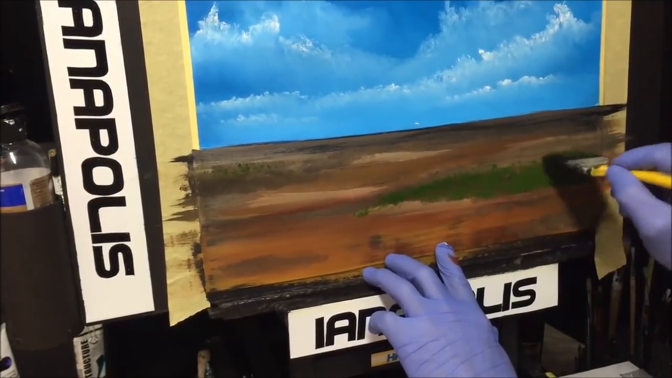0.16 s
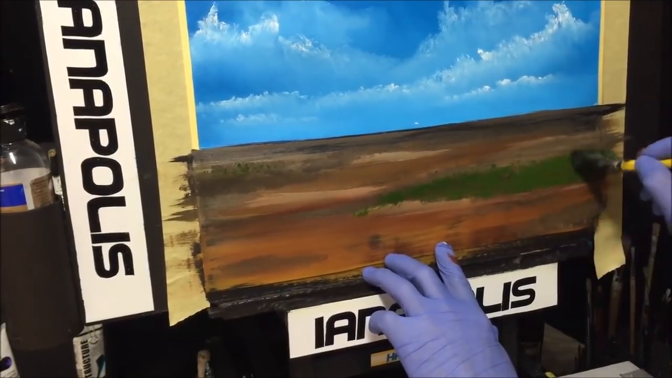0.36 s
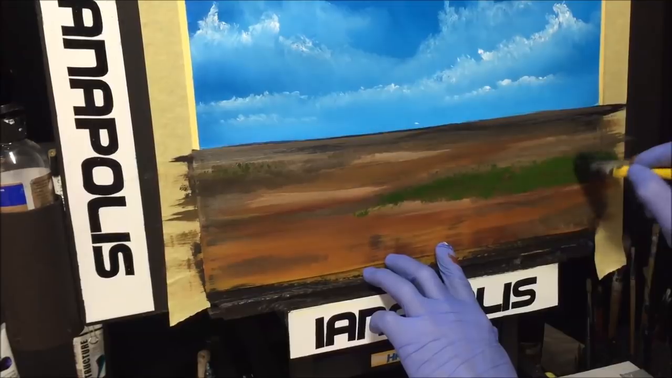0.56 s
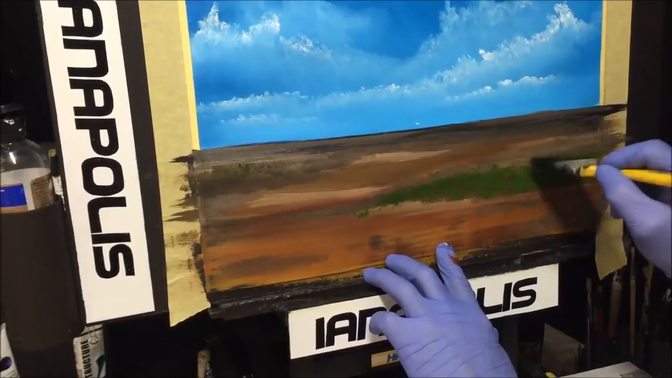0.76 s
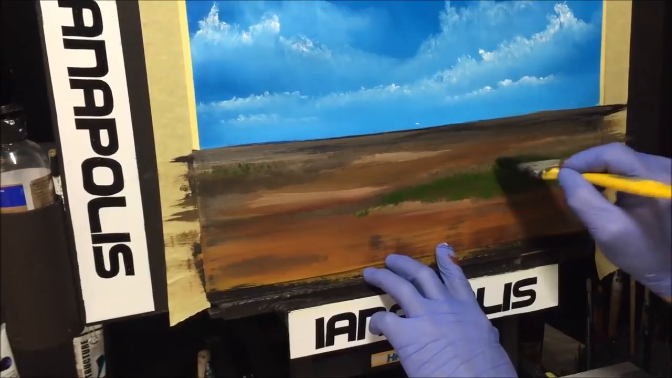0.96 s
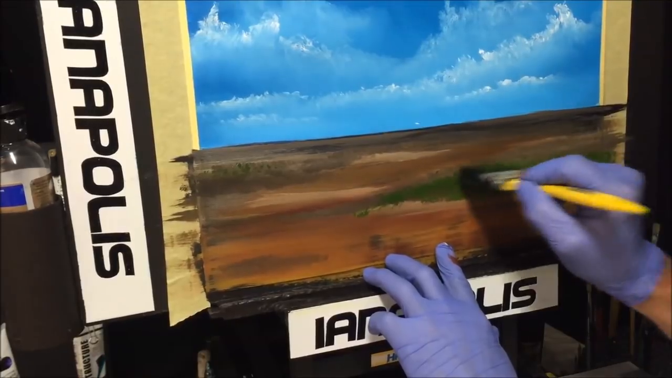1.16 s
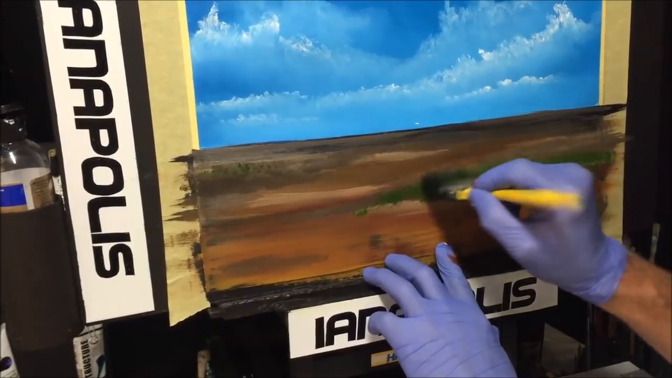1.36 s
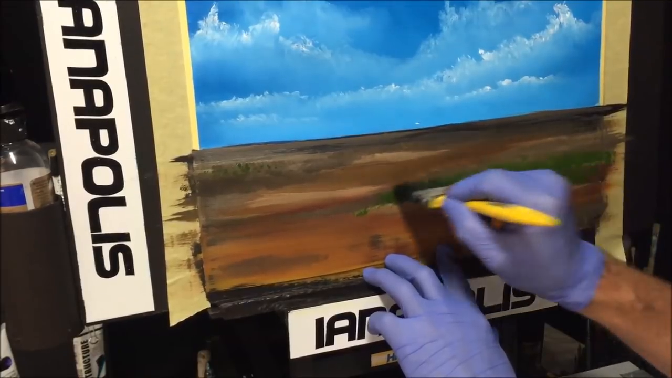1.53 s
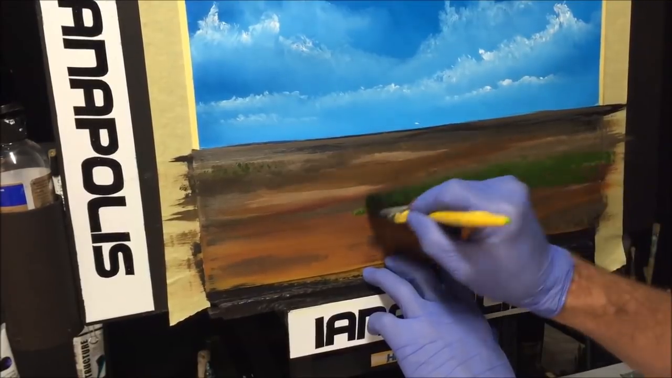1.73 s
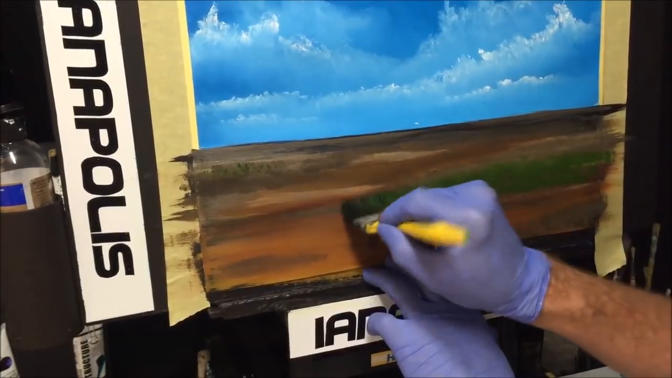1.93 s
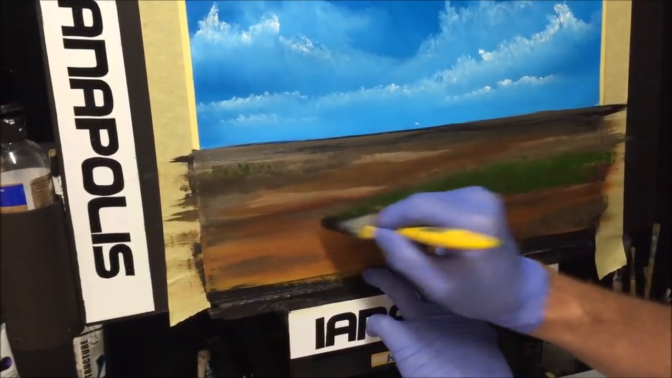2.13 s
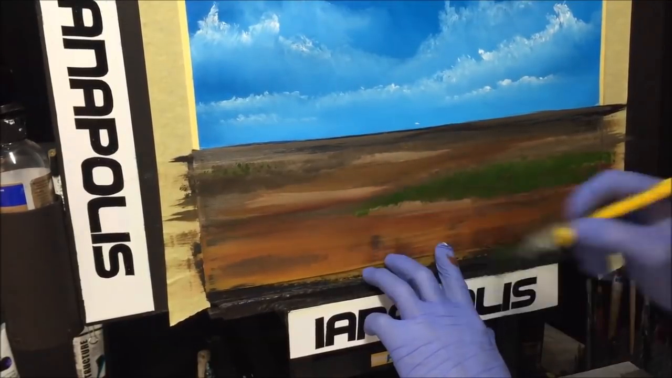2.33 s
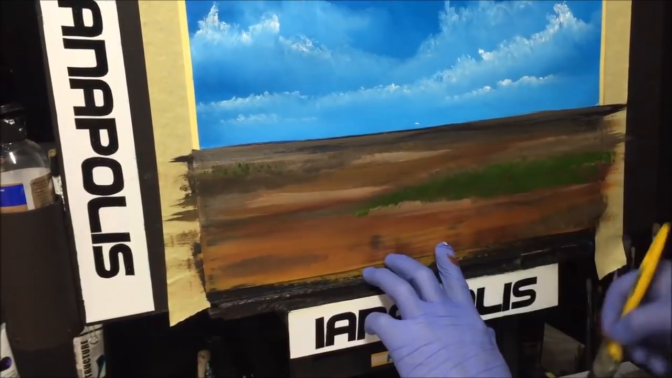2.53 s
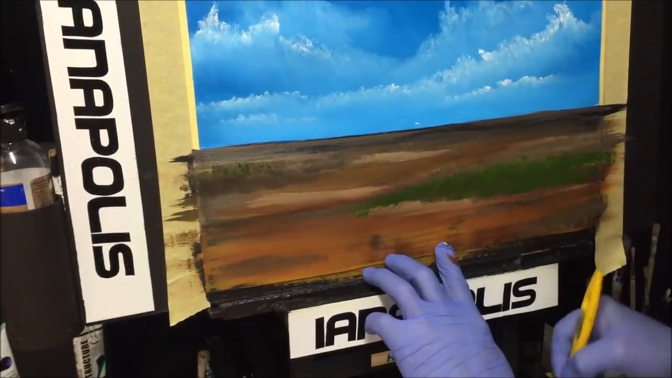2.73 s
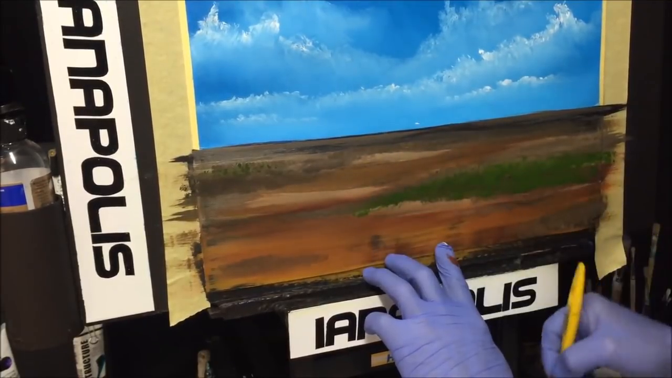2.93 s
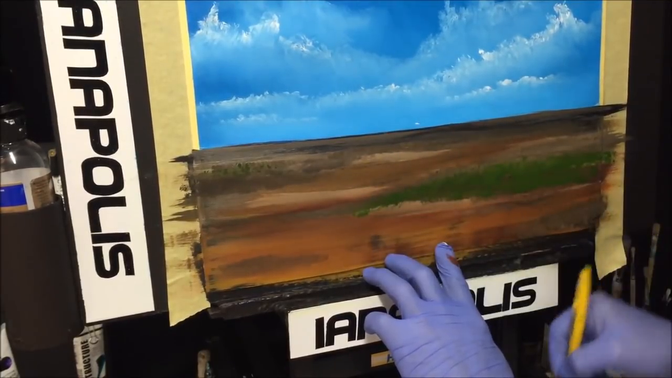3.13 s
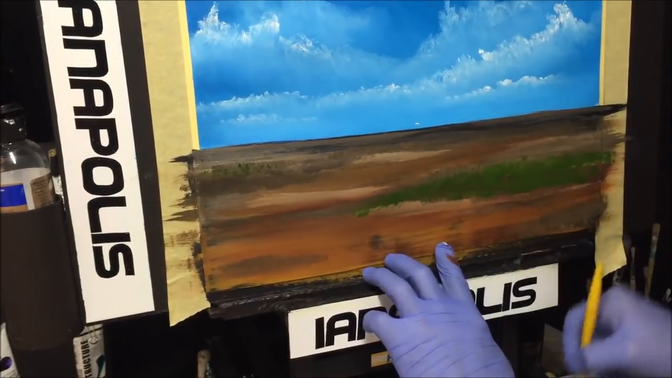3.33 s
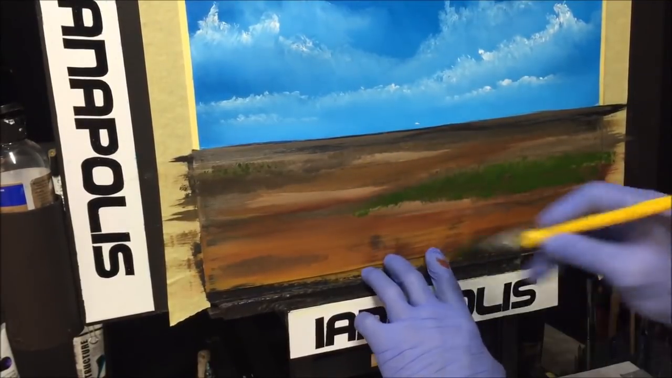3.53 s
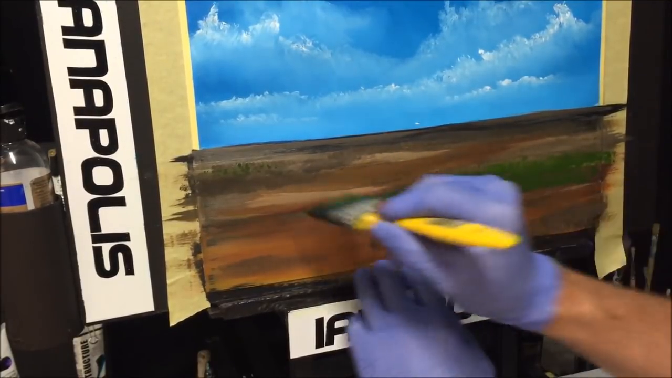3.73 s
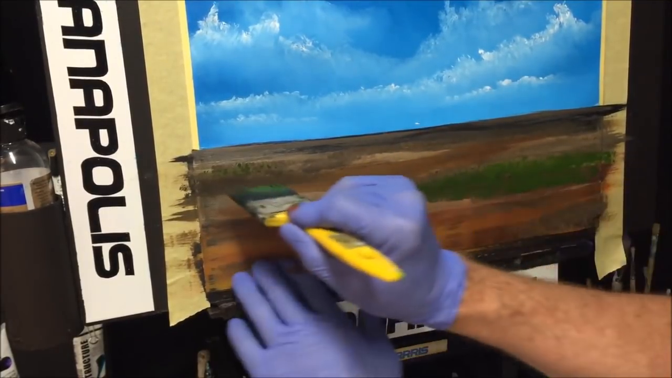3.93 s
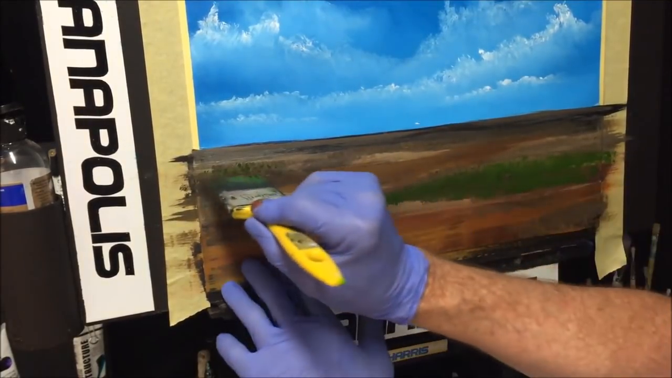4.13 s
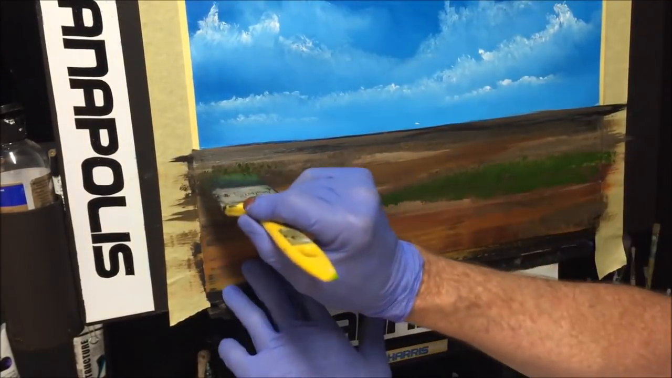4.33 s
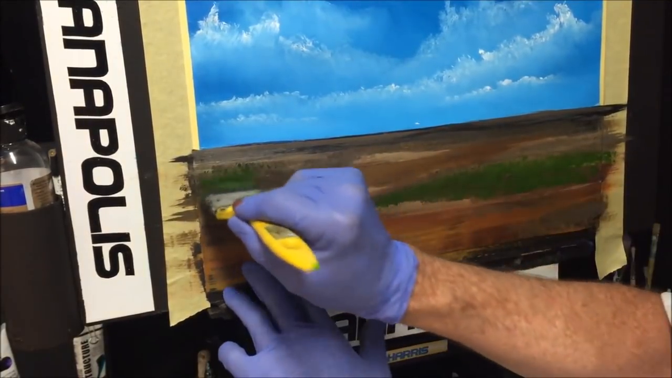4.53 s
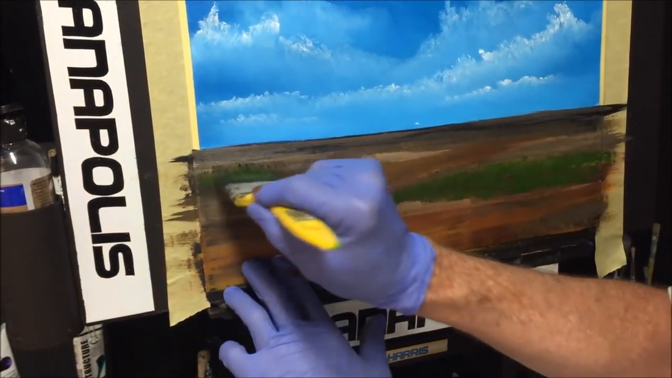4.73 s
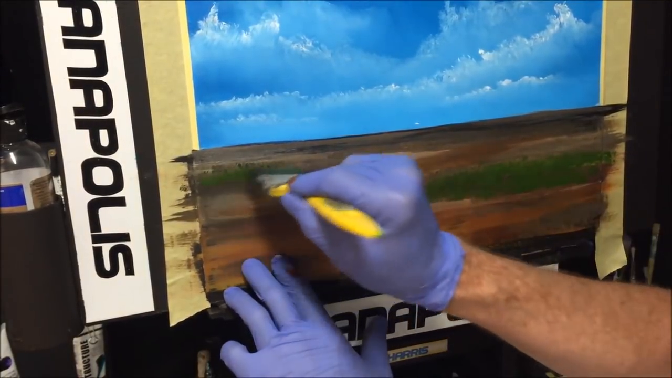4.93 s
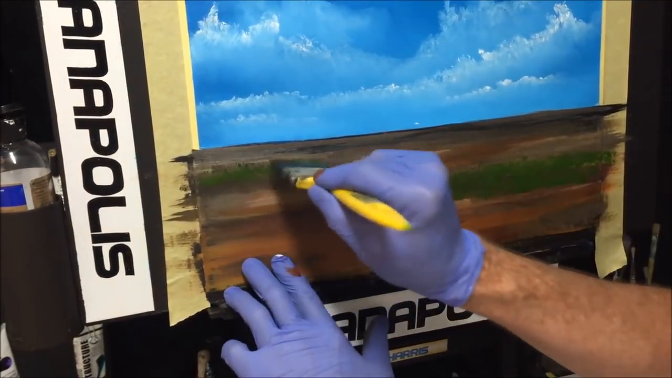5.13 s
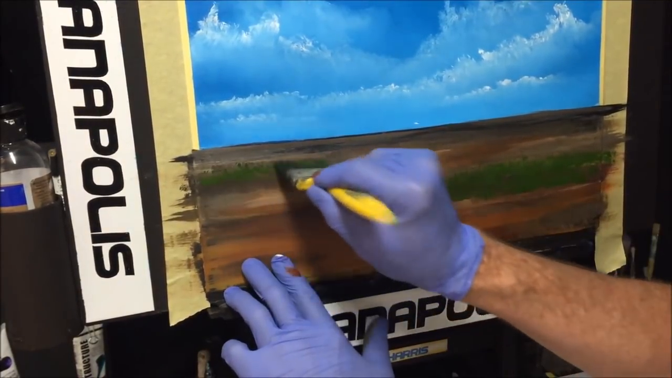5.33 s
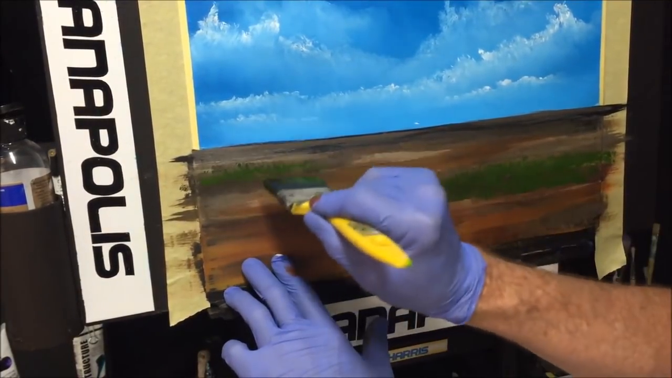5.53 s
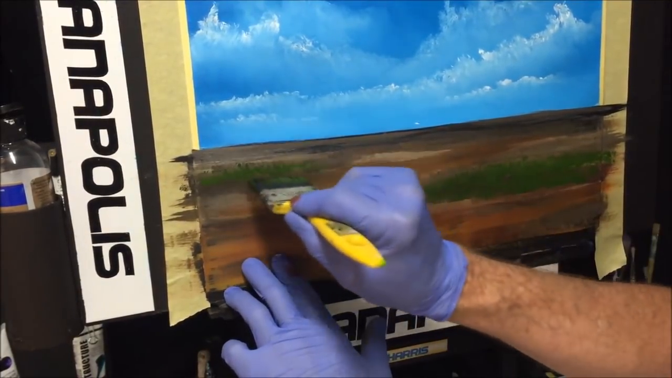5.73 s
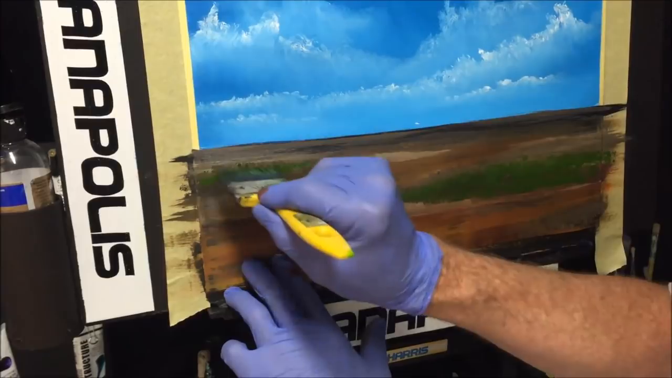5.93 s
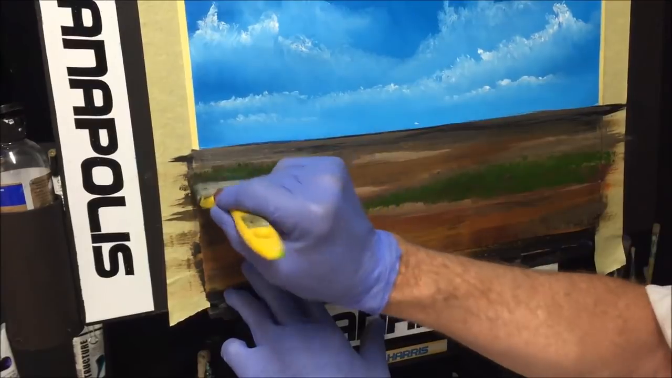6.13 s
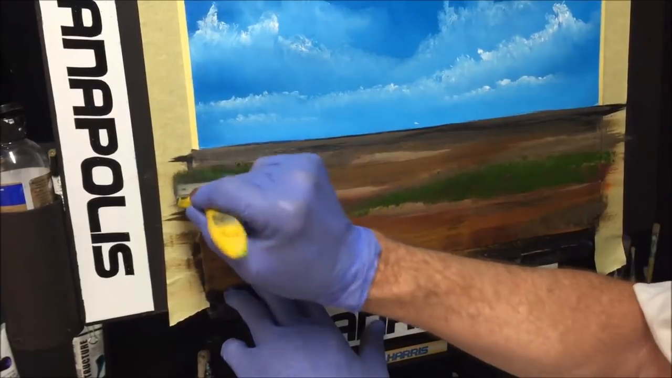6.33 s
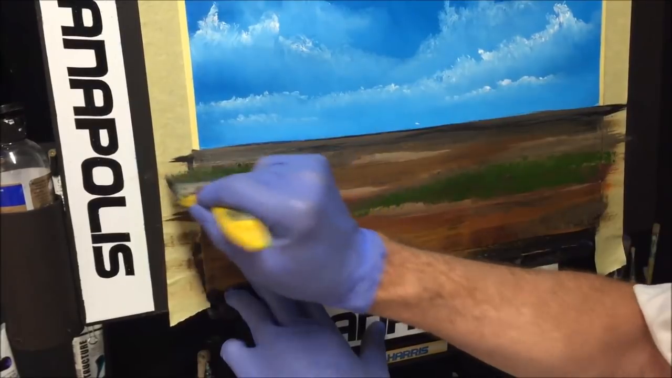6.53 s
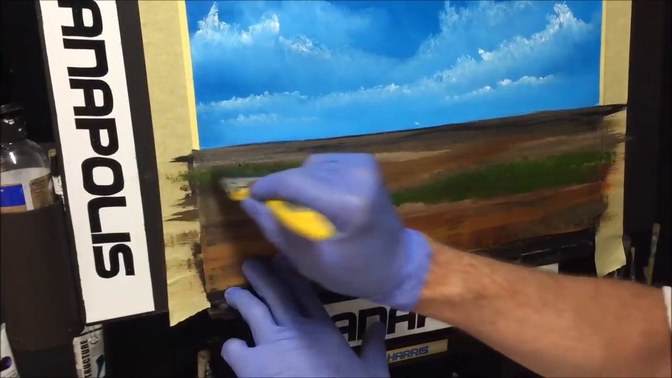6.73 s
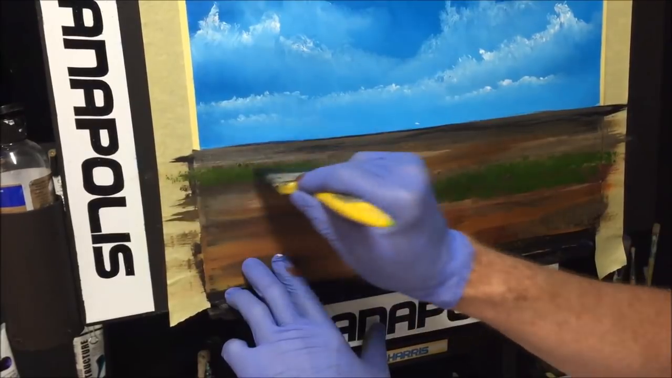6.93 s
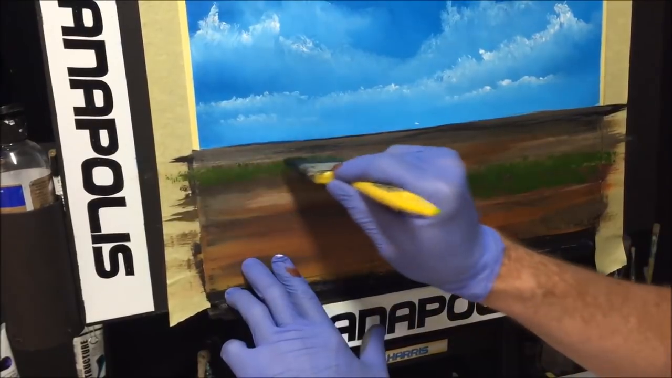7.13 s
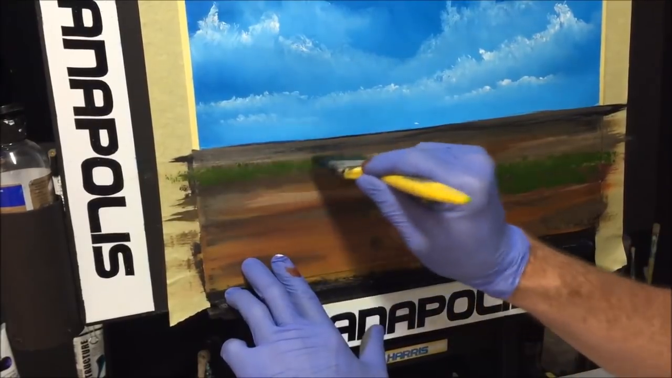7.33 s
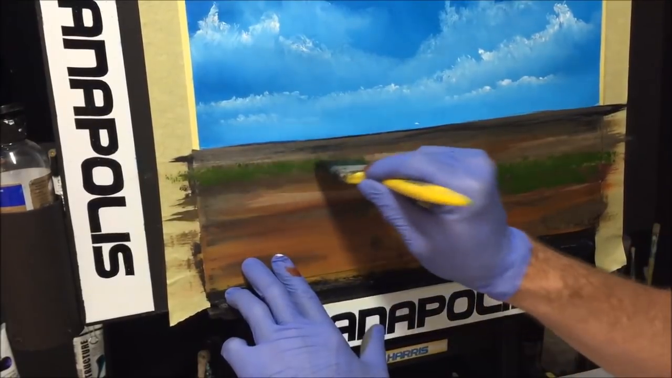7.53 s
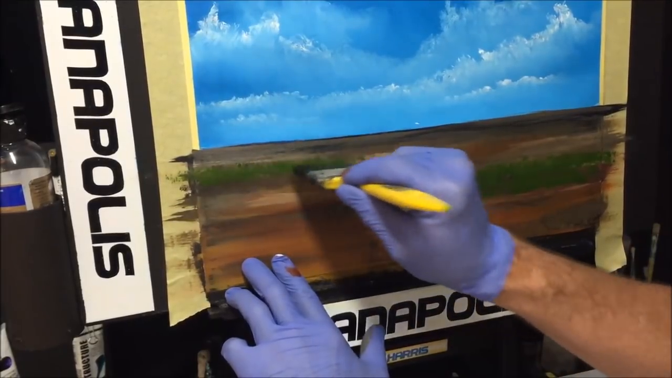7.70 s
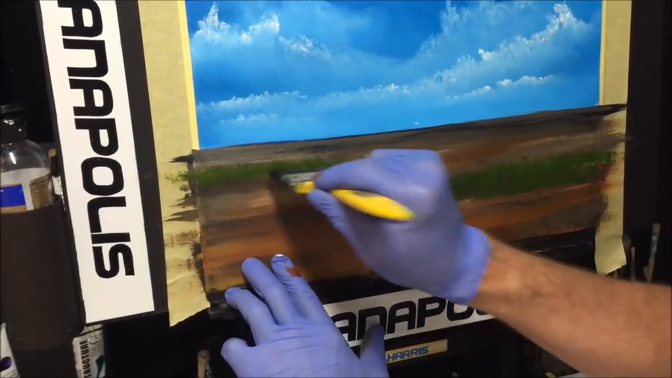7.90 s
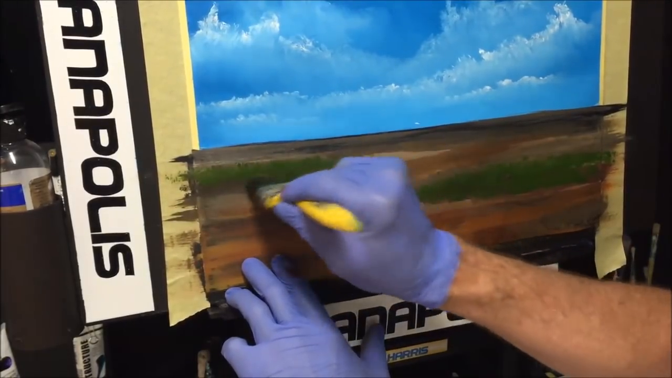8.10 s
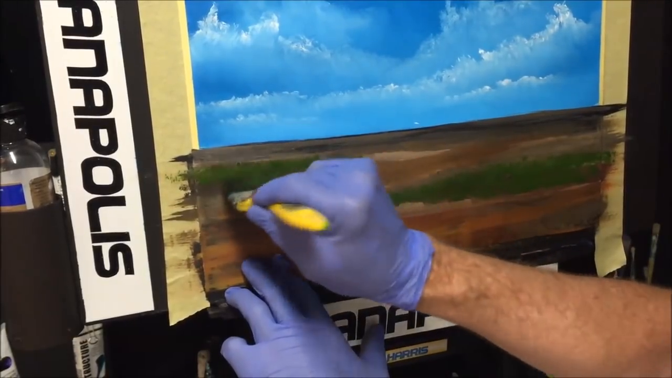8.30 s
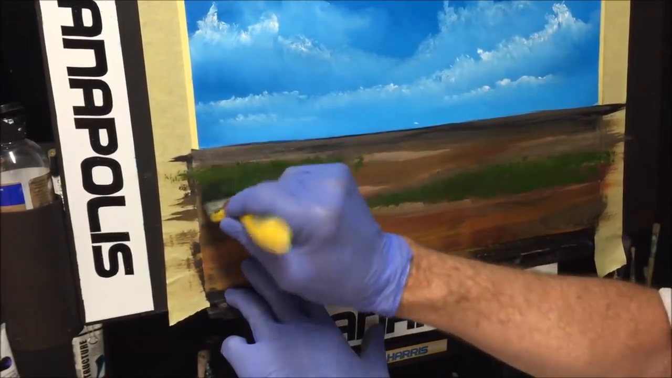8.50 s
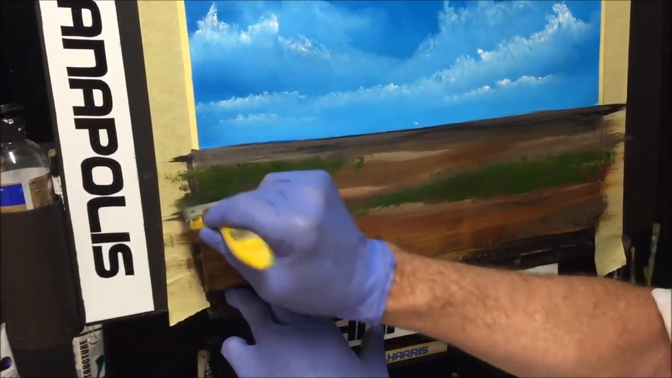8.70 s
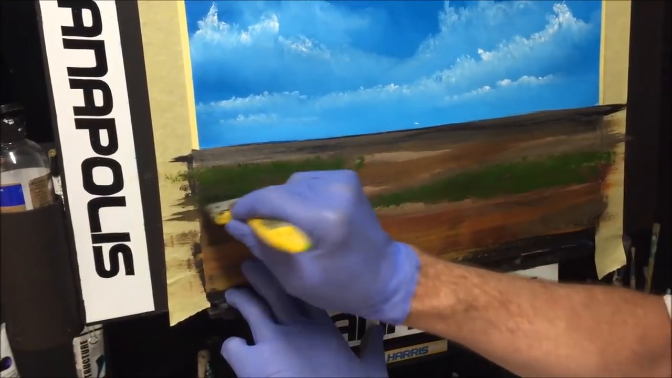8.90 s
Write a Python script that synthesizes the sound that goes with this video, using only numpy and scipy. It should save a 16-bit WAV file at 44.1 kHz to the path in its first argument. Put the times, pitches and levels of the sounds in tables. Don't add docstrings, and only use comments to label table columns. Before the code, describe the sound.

Quick, steady brush taps thud on a hollow board in a quiet room, broken by four wetter dabs, then resume harder and brighter over faint hum.

```python
import sys
import numpy as np
from scipy import signal
from scipy.fft import rfft, irfft, next_fast_len
from scipy.io import wavfile
from scipy.ndimage import uniform_filter1d

SR = 44100
rng = np.random.default_rng(int(sys.argv[2]) if len(sys.argv) > 2 else 0)


def undo_db(level):
    steps = np.asarray(level, float) / 20
    return 10 ** steps


def store_pcm(level_fs):
    pcm = np.round(np.clip(level_fs, -1, 1) * 32767).astype(np.int16)
    wavfile.write(sys.argv[1], SR, np.atleast_2d(pcm).T)


N = 399546


def rms_one(x):
    return x / np.sqrt(np.mean(x ** 2) + 1e-20)


def low_pass(x, hz):
    return signal.sosfilt(signal.butter(2, hz, fs=SR, output="sos"), x)


def high_pass(x, hz, order=2):
    return signal.sosfilt(signal.butter(order, hz, "high", fs=SR, output="sos"), x)


def band_pass(x, low_hz, high_hz):
    return signal.sosfilt(signal.butter(2, [low_hz, high_hz], "band", fs=SR, output="sos"), x)


def in_time(rows):
    s, values = np.transpose(rows)
    return np.interp(np.arange(N) / SR, s, values)


def spikes(times, sizes):
    out = np.full(N, 1e-18)
    places = np.clip((np.asarray(times) * SR).astype(int), 0, N - 1)
    np.add.at(out, places, sizes)
    return out


def fade(x, t60):
    return signal.lfilter([1], [1, -undo_db(-60 / (t60 * SR))], x)


def ring(clicks, hz, t60):
    r = undo_db(-60 / (t60 * SR))
    w = 2 * np.pi * hz / SR
    return signal.lfilter([0, np.sin(w)], [1, -2 * r * np.cos(w), r * r], clicks)


def coloured(x, points):
    hz, level_db = np.transpose(points)
    size = next_fast_len(N)
    grid = np.maximum(np.arange(size // 2 + 1) * SR / size, 1)
    gain = undo_db(np.interp(np.log(grid), np.log(hz), level_db))
    return rms_one(irfft(rfft(x, size) * gain, size)[:N])


def grains(per_s, spread_db):
    sizes = undo_db(spread_db * np.minimum(rng.exponential(1, N), 5))
    signs = rng.choice([-1, 1], N)
    return sizes * signs * (rng.random(N) < per_s / SR)


def narrow(hz, width_hz):
    r = np.exp(-2 * np.pi * width_hz / SR)
    wander = rms_one(signal.lfilter([1], [1, -2 * r, r * r], rng.standard_normal(N)))
    return np.sqrt(2) * np.sin(2 * np.pi * np.cumsum(hz + width_hz * wander) / SR)


def lumps(depth_db, per_s):
    knots = np.arange(0, N / SR + 1, 1 / per_s)
    return undo_db(depth_db * np.interp(np.arange(N) / SR, knots, rng.standard_normal(len(knots))))


def stabs():
    # start_s, thump_db, hardness_db, handle_knock_db, crack_db
    right_stabs = [(0.1326, -19, -6, -31, -30), (0.3043, -15, -5, -27.5, -27),
                   (0.4689, -19, -17, -31, -27.5), (0.628, -23.5, -37.5, -25.5, -28),
                   (0.797, -19.5, -8, -24.5, -30), (0.9719, -24.5, -5.5, -30.5, -31),
                   (1.1345, -20.5, -11.5, -32, -28.5), (1.31, -19, -8, -27, -33.5),
                   (1.4864, -20, -10, -41.5, -36), (1.6663, -21.5, -7, -28, -34),
                   (1.8429, -27.5, -17, -29, -30.5), (2.015, -23.5, -10.5, -31, -29.5),
                   (2.1792, -25.5, -9.5, -24, -23)]
    dabs = [
        (2.813, -27, -15, -66, -26),
        (3.022, -21, -4.5, -28.5, -32.5),
        (3.2138, -19, -3, -20, -38.5),
        (3.3946, -11.5, -5, -43.5, -17),
        (3.4, -61, -4.5, -73, -12.5),
    ]
    left_stabs = [(4.5563, -22.5, -1.5, -24, -19), (4.7633, -25.5, -3.5, -38.5, -27),
                  (4.9406, -17.5, -5, -26, -28), (5.1266, -15, -2.5, -22.5, -24.5),
                  (5.2995, -15.5, -3, -14, -19), (5.4683, -16.5, -2.5, -17, -25.5),
                  (6.1977, -21, -2.5, -20.5, -18.5), (6.402, -20, -3, -31.5, -23),
                  (6.5819, -20, -5.5, -29, -24.5), (6.784, -17, -2.5, -25.5, -22),
                  (6.967, -15, -2.5, -31, -22.5), (7.1517, -18, -3, -27.5, -24),
                  (7.3346, -22.5, -2.5, -31, -27.5), (7.5104, -19, -6.5, -31.5, -25.5),
                  (7.6885, -21, -5.5, -27.5, -22.5), (7.8674, -24, -3, -36.5, -25),
                  (8.0585, -15.5, -3.5, -27, -20), (8.234, -18, -3.5, -23, -22.5),
                  (8.4114, -21, -4, -24.5, -23.5), (8.586, -22, -2.5, -22.5, -21.5),
                  (8.76, -24.5, -2, -25.5, -27.5), (8.9599, -21.5, -3, -25.5, -24.5)]
    return np.transpose(right_stabs + dabs + left_stabs)


def grip(s):
    # start_s, board_looseness_db, board_pitch_hz, handle_pitch_hz
    grips = [(0.133, -17.5, 316.8, 2230), (0.303, -17.5, 281.8, 2450), (0.468, -21.5, 273, 2360),
             (0.628, -34, 276.5, 2650), (0.796, -24.5, 295, 2550), (0.969, -23, 326, 2620),
             (1.134, -22.5, 315.9, 1910), (1.309, -21, 326, 2070), (1.486, -24, 326, 1890),
             (1.666, -21.5, 326, 1650), (1.843, -22.5, 318.2, 1566), (2.014, -22, 331.6, 1800),
             (2.177, -24, 334, 1866), (2.811, -26, 261, 3500), (3.02, -16, 261, 1300),
             (3.213, -12.5, 268, 1292), (3.394, -15.5, 260, 3220), (4.554, -18.5, 377.7, 1460),
             (4.762, -25.5, 377, 3160), (4.939, -14.5, 386.4, 2890), (5.124, -18.5, 361, 1500),
             (5.298, -21, 365, 1380), (5.466, -17, 362.6, 1305), (6.196, -17, 373.8, 1340),
             (6.4, -15.5, 372, 1370), (6.581, -14, 370, 3280), (6.783, -17.5, 372.2, 1870),
             (6.966, -10, 367, 1520), (7.15, -18, 375.8, 2740), (7.333, -18.5, 358, 1690),
             (7.51, -16.5, 342, 2135), (7.688, -17.5, 347, 1757), (7.866, -18.5, 335, 1800),
             (8.057, -16, 373, 2520), (8.232, -16.5, 340.7, 2750), (8.41, -17.5, 376, 2620),
             (8.585, -18.5, 380, 3190), (8.759, -20, 363.3, 1320), (8.958, -16.5, 367, 2620)]
    knots, *columns = np.transpose(grips)
    return [np.interp(s, knots, c) for c in columns]


def on_palette(s):
    # from_s, to_s
    loading_time = (2.6, 3.6)
    return (s > loading_time[0]) & (s < loading_time[1])


def struck(times, level_db, modes, rattle, rattle_db, centre_hz=None, reach=0.0818, alternate=False):
    chance = rng.standard_normal((len(times), len(modes)))
    shaking = fade(spikes(times, undo_db(rattle_db)), 0.1758)
    out = 0
    for k, (hz, mode_db, t60) in enumerate(modes):
        off_db = 0
        if centre_hz is not None:
            off_db = -np.minimum(10 * (np.log(hz / centre_hz) / reach) ** 2, 19.0)
        sign = (-1) ** (k * alternate)
        blows = spikes(times, undo_db(level_db + mode_db + off_db + 2 * chance[:, k]) * sign)
        shaken = undo_db(0.32 * mode_db) * shaking * np.roll(rattle, 997 * k)
        out = out + ring(blows + shaken, hz, t60)
    return out


def thuds(times, level_db, pitches):
    out, t = np.zeros(N + SR), np.arange(SR // 16) / SR
    t60_s = 0.029
    for s, db, hz in zip(times, level_db, pitches):
        out[int(s * SR) + np.arange(len(t))] += undo_db(db - 60 * t / t60_s) * np.sin(2 * np.pi * hz * t)
    return out[:N]


def thumps(rattle):
    # pitch_hz, level_db, t60_s
    panel_low = [(140, -2, 0.071), (193.9, -17, 0.12), (211.44, -10.5, 0.355), (259.04, -1.5, 0.19),
                 (295, 7, 0.087), (326, -3.5, 0.1216), (346.2, 6.5, 0.1258), (361, -1, 0.07),
                 (380, 6, 0.0808), (401.1, -1, 0.04), (438.7, 3.5, 0.032)]
    panel_mid = [(441.4, -18, 0.01), (513.8, -4, 0.0307), (563.6, 2, 0.046), (630.7, -4, 0.049),
                 (677.5, -1.5, 0.041)]
    panel_upper = [(777, -27.5, 0.0166), (808, -6, 0.033), (1065, 5, 0.0219), (888.1, -6.5, 0.0265),
                   (1026.3, 0, 0.0339), (1256, 4.5, 0.021)]
    # pitch_hz, level_db, t60_s
    palette = [(146, -29, 0.21), (214.3, -7, 0.15), (237.8, -3.5, 0.2), (254, 3.5, 0.18), (257.8, 4, 0.095),
               (279.7, -5.5, 0.287), (312.9, -5, 0.23), (326.4, -6, 0.29), (370, 7, 0.089),
               (615.5, -4, 0.14), (432, -10.5, 0.013), (642.5, -13.5, 0.11)]
    s, low_db, hard_db = stabs()[:3]
    loose_db, hz = grip(s)[:2]
    loose_db = loose_db + 2.5
    loading = on_palette(s)
    mid_db = low_db + hard_db
    upper_db = low_db + 3.883 * hard_db + 8.5 * loading
    ahead_s = 0.000789

    body = struck(s, low_db - 11 - 13.0 * loading, panel_low, undo_db(-50.0) * rattle, loose_db, centre_hz=hz)
    body += struck(s[loading], low_db[loading] - 17.0, palette, undo_db(-43.5) * rattle, loose_db[loading],
                   alternate=True)
    earlier_db = -71
    body += struck(np.zeros(1), earlier_db, panel_low, rattle, earlier_db)
    body += thuds(s - ahead_s * loading, low_db - 10.5 + 11 * loading, hz)
    body = low_pass(body, 620)
    body += struck(s - ahead_s / 2, mid_db - 9.0, panel_mid, undo_db(-50.0) * rattle, loose_db)
    body += struck(s - ahead_s, upper_db - 7.0, panel_upper, undo_db(-28.5) * rattle, upper_db - 7.5,
                   alternate=True)
    return high_pass(body, 150)


def knocks(rattle, crackle, wet):
    # pitch_hz, level_db, t60_s
    handle = [(1305, -4.5, 0.036), (1503, 3.5, 0.0311), (1780.7, 5.5, 0.0391), (2000, 12, 0.01154),
              (2550, 9, 0.0096), (2724, 5.5, 0.0257), (2962.5, 7, 0.012), (4514, -5.5, 0.02)]
    # pitch_hz, level_db per Hz
    crack_colour = [(1470, -7), (2500, -5), (3220, 1.5), (6300, -6), (7860, -10.5), (13300, -17.5),
                    (16500, -31.5)]
    # dull_db, bright_db
    squeezes = [
        (-46, -41),
        (-38.5, -39),
        (-43, -32),
        (-28.5, -32.5),
        (-53, -56.5),
    ]
    s, *_, knock_db, crack_db = stabs()
    s = s - 0.0022015
    hz = grip(s)[2]
    loading, left = on_palette(s), s > 4

    knock = struck(s, knock_db - 7.5, handle, undo_db(-50) * rattle, knock_db + 2.5, centre_hz=hz, reach=0.2305,
                   alternate=True)
    knock = high_pass(knock, 1000)

    crack = fade(spikes(s, undo_db(crack_db - 9)), 0.02853)
    crack += fade(spikes(s, undo_db(crack_db - 16.5)), 0.0213)
    crack = rms_one(fade(crack, 0.00445)) * np.std(crack)
    crack = crack * coloured(grains(6000, 1.0), crack_colour)

    grind_db = 0.0803 * knock_db + 0.4517 * crack_db - 29.5
    bright_grind_db = grind_db - 1 * left
    dull_grind_db = grind_db - 10.5 + 2 * left
    grind = fade(spikes(s[~loading], undo_db(bright_grind_db[~loading])), 0.1437) * crackle
    grind += fade(spikes(s, undo_db(dull_grind_db)), 0.418) * low_pass(crackle, 4500)

    dull_db, bright_db = np.transpose(squeezes)
    squelch = fade(spikes(s[loading], undo_db(bright_db)), 0.14) * wet
    squelch += fade(spikes(s[loading], undo_db(dull_db)), 0.3314) * low_pass(wet, 7000)
    return knock + crack + grind + squelch


def touches():
    # start_s, level_db
    tip_touches = [(0.127, -45), (0.461, -54), (0.6239, -70), (0.965, -47.5), (1.1278, -43), (1.305, -38),
                   (1.478, -36.5), (1.656, -38), (1.8301, -42), (1.9993, -40), (2.164, -38), (2.806, -55),
                   (3.21, -56),
                   (4.5426, -51.5), (4.749, -51), (4.928, -46), (5.112, -41), (5.2855, -42), (5.46, -34),
                    (6.187, -49.5), (6.3942, -43), (6.576, -42), (6.7745, -38), (6.956, -39.5),
                    (7.1372, -45), (7.3192, -43.5), (7.493, -42.5), (7.672, -44), (7.85, -48),
                    (8.0435, -41.5), (8.222, -44), (8.401, -47.5), (8.5786, -53.5), (8.76, -34.5),
                    (8.952, -43.5)]
    # pitch_hz, width_hz, level_db
    bristle = [(1628, 390, 0), (2440, 890, 1), (3686, 57, -19), (5796, 400, -14)]
    slap_db, slap_s, rise_s = 5, 0.00446, 0.0015
    push = np.zeros(N)
    thump_s = stabs()[0]
    for s, level_db in tip_touches:
        ahead_s = min(thump_s[thump_s > s].min() - s, .03)
        steps = np.arange(int(max(1.6 * ahead_s, .002) * SR))
        fall_db = -1.9 * steps / len(steps) + slap_db * np.exp(-steps / (slap_s * SR))
        rise = np.minimum(steps / (rise_s * SR), 1)
        push[int(s * SR) + steps] = undo_db(level_db + fall_db) * rise
    slips = push * rms_one(grains(7000, 3.314)) + 1e-18
    bundle = 0
    for hz, width_hz, db in bristle:
        t60 = np.log(1000) / np.pi / width_hz
        bundle = bundle + undo_db(db) * np.sqrt(width_hz) * ring(slips, hz, t60)
    return undo_db(-37.5) * band_pass(bundle, 1000, 6000)


def peels(crackle, wet):
    # middle_s, level_db
    early_lifts = [(0.03, -54.5), (0.203, -57.5), (0.377, -52), (0.54, -53.5), (0.703, -54), (0.866, -57.5),
                   (1.046, -54), (1.214, -51.5), (1.38, -60), (1.558, -58.5), (1.734, -54), (1.911, -49.5),
                   (2.083, -50), (2.217, -48), (2.918, -45), (3.108, -47), (3.291, -44.5), (3.465, -47)]
    # middle_s, level_db
    late_lifts = [(4.627, -53), (4.82, -56), (4.994, -58.5), (5.175, -54.5), (5.513, -57), (6.263, -56.5),
                  (6.465, -55), (6.633, -56), (6.836, -56), (7.024, -55), (7.207, -51), (7.386, -54.5),
                  (7.561, -52.5), (7.74, -52.5), (7.92, -52), (8.12, -54), (8.287, -51), (8.463, -56),
                  (8.651, -51), (8.835, -50.5), (9.022, -51.5)]
    fizz = high_pass(wet, 3500, order=1)
    t, swell = np.arange(N) / SR, np.zeros(N)
    for lifts, half_s in ((early_lifts, 0.01124), (late_lifts, 0.01085)):
        for s, level_db in lifts:
            near = slice(max(int((s - .1) * SR), 0), int((s + .1) * SR))
            swell[near] += undo_db(level_db) * np.exp(-.5 * ((t[near] - s) / half_s) ** 2)
    return swell * np.where(on_palette(t), undo_db(6) * fizz, crackle)


def flicks():
    # start_s, level_db, centre_hz, spread_octaves,
    # t60_s
    scrapes = [(2.128, -47, 4000, 0.9, 0.0155), (2.134, -42, 5000, 0.72, 0.034),
               (2.148, -52.5, 4000, 1.1, 0.0395), (2.879, -47, 5030, 0.76, 0.102),
               (2.293, -43.5, 4000, 0.98, 0.0145), (2.2985, -42, 4500, 0.72, 0.0327),
               (3.2843, -43, 5000, 0.55, 0.023), (3.397, -16, 7000, 1.6, 0.0057),
               (3.222, -49.5, 10000, .5, .01), (2.178, -34, 4000, 0.95, 0.0138),
               (3.5005, -38, 4600, 0.32, 0.016), (3.5425, -32.5, 4830, 1.05, 0.0068),
               (3.5465, -41.5, 4950, 0.77, 0.0306), (5.05, -58, 4500, 0.88, 0.035),
               (5.238, -52, 3500, 0.8, 0.02), (6.909, -57, 5470, 0.4, .03),
               (7.098, -58.5, 3000, 1.18, 0.048)]
    ticks = [
        (3.764, -62, 3500, 1.1, .02),
        (3.829, -47, 12000, .9, .003),
    ]
    out, size, rows = np.zeros(N), 4096, scrapes + ticks
    steps = np.arange(size)
    octave = np.log2(np.maximum(np.arange(size // 2 + 1) * SR / size, 1))
    for s, level_db, hz, spread, t60 in rows:
        noise = rng.standard_normal(size)
        hump = undo_db(-6 * ((octave - np.log2(hz)) / spread) ** 2)
        shaped = rms_one(irfft(rfft(noise) * hump, size))
        out[int(s * SR) + steps] += undo_db(level_db - 60 * steps / SR / t60) * shaped
    return out


def snaps(crackle):
    # start_s, peak_db, pitch_hz
    stray_snaps = [(2.128, -45, 2220), (2.292, -51, 2580), (2.2973, -54, 2440), (2.5825, -73.5, 3220),
                   (4.37, -62, 2438), (4.831, -49, 1494), (5.0134, -49, 1430), (5.047, -65.5, 1330),
                   (5.236, -62.5, 2400), (6.4715, -48, 1300), (6.6966, -55.5, 1550), (6.909, -62.5, 1360),
                   (7.056, -53, 1220), (7.1003, -62, 2150), (7.2876, -66, 2480), (7.467, -60, 1470),
                   (7.9576, -62, 2080), (8.1448, -60, 4170), (8.317, -57.5, 2000)]
    s, level_db, _ = np.transpose(stray_snaps)
    ring_s, puff_s = .008, .04
    puffs = fade(fade(spikes(s, undo_db(level_db)), puff_s), 0.024)
    out = undo_db(-39) * puffs * low_pass(crackle, 5000)
    t = np.arange(SR // 40) / SR
    for start, db, pitch_hz in stray_snaps:
        tone = undo_db(db + 17 - 60 * t / ring_s) * np.sin(2 * np.pi * pitch_hz * t)
        out[int(start * SR) + np.arange(len(t))] += tone
    return out


def patchy(x, depth_db, per_s):
    size = next_fast_len(N)
    edges = 700 * 2 ** np.arange(0, 5, .4)
    spectrum = rfft(x, size)
    band = np.digitize(np.arange(len(spectrum)) * SR / size, edges)
    out = 0
    for k in range(len(edges) + 1):
        out = out + irfft(spectrum * (band == k), size)[:N] * lumps(depth_db, per_s)
    return rms_one(out)


def paint():
    # pitch_hz, level_db per Hz
    thin_colour = [(530, -36.5), (900, -1.5), (2470, 5), (3310, 1.5), (8980, -1), (10400, -7.5),
                   (12300, -4.5), (15900, -8.5), (16500, -22)]
    # pitch_hz, level_db per Hz
    thick_colour = [(530, -12.5), (900, -12), (1040, -11.5), (1610, -17), (14600, -21), (15900, -22),
                    (16500, -49.5)]
    fine = patchy(grains(6000, 3.0), depth_db=3.5, per_s=40)
    return coloured(fine, thin_colour), coloured(fine, thick_colour)


def easel():
    # time_s, level_db
    lean = [(0, -43.5), (.8, -47), (1.2, -49.5), (2.2, -48.5), (2.4, -53.5), (3, -39.5), (3.5, -46),
            (4.6, -43.5), (5.5, -46.5), (6.3, -46.5), (6.7, -44.5), (7.0, -52), (7.06, -38.5),
            (7.14, -29.5), (7.2, -42), (8, -46), (9.06, -53)]
    s, thump_db = stabs()[:2]
    pushes = spikes(np.append(s, 0), np.append(thump_db > -40, 1))
    sway = rms_one(fade(fade(pushes, 1), 0.32))
    sway = undo_db(in_time(lean) - 6.5) * sway * lumps(depth_db=4.0, per_s=14)
    boom = fade(spikes(s, undo_db(thump_db - 17.5) * on_palette(s)), 0.38)
    shudder = rms_one(band_pass(rng.standard_normal(N), 58, 125))
    frame = sway * (narrow(70, width_hz=7.94) + undo_db(-4.0) * shudder)
    return frame + boom * (narrow(96, width_hz=5.0) + undo_db(-9.0) * shudder)


def motor():
    # pitch_hz, rms_db
    hum = [(49, -62), (147, -72), (196, -70), (295, -78.5), (350, -76), (393, -80), (451, -80)]
    # time_s, level_db
    swell = [(0, -42.5), (.25, -63.5), (.6, -47.5), (1.2, -57.5), (1.7, -52), (2, -62), (2.3, -53),
             (2.6, -78.5), (3.73, -60.5), (3.94, -51.5), (4.11, -67), (4.54, -51), (4.8, -71.5), (5.6, -56),
             (5.88, -73), (6.21, -52.5), (7.1, -57.5), (9.06, -56.5)]
    t, tones = np.arange(N) / SR, 0
    for hz, db in hum:
        sine = np.sin(2 * np.pi * (hz * t + rng.random()))
        tones = tones + undo_db(db) * lumps(depth_db=4.5, per_s=14) * sine
    second = undo_db(in_time(swell)) * lumps(depth_db=1.0, per_s=10) * narrow(98.5, width_hz=1.54)
    return np.sqrt(2) * tones + second


def air():
    # pitch_hz, level_db per Hz
    air_colour = [(25, -33.5), (55, -51.5), (120, -18.5), (250, -4), (420, -9), (560, -10), (2000, -14),
                  (4300, -17), (5000, -23), (5800, -19), (13300, -27), (15800, -31.5), (16500, -56.5)]
    return undo_db(-67.5) * coloured(rng.standard_normal(N), air_colour)


def studio(x):
    t60_s, wall_cut_hz = 0.431, 2900
    size = next_fast_len(N + SR)
    w = np.arange(size // 2 + 1) * 2 * np.pi / size
    dull = 1 / (1 + 1j * w * SR / (2 * np.pi * wall_cut_hz))
    lags_s = np.geomspace(.014, .052, num=20) * rng.uniform(.85, 1.15, size=20)
    combs = 0
    for k, lag in enumerate(lags_s):
        loop = undo_db(-60 * lag / t60_s) * dull ** 0.116 * np.exp(-1j * w * lag * SR)
        combs = combs + (-1) ** k * loop / (1 - loop)
    return irfft(rfft(x, size) * combs * dull, size)[:N]


def scene():
    crackle, wet = paint()
    rattle = rms_one(grains(3000, 2.8))
    brush = thumps(rattle) + knocks(rattle, crackle, wet) + touches()
    brush += peels(crackle, wet) + flicks() + snaps(crackle)
    mono = brush + undo_db(-25.5) * studio(brush) + easel() + motor() + air()
    return np.array([mono, mono])


def mute(x):
    # from_hz, to_hz, margin_db
    mutes = [(8800, 11500, -41), (11500, 14000, -41), (14000, 17000, -41)]
    size = next_fast_len(N)
    spectrum, hz = rfft(x, size), np.arange(size // 2 + 1) * SR / size
    whole = uniform_filter1d(x ** 2, size=1500)
    for low, high, margin_db in mutes:
        band = irfft(spectrum * (hz >= low) * (hz < high), size)[:N]
        faint = uniform_filter1d(band ** 2, size=700) < undo_db(2 * margin_db) * whole
        x = x - band * uniform_filter1d(1.0 * faint, size=200)
    return x


def band_limit(x):
    return signal.sosfilt(signal.butter(12, 16970, fs=SR, output="sos"), x)


def record(dry):
    dry = high_pass(dry, 43, order=3)
    headroom = .6
    dry = headroom * np.tanh(dry / headroom)
    dry = signal.sosfilt(signal.cheby2(10, 50, 16800, fs=SR, output="sos"), dry)
    mono = mute(dry[0])
    treble = high_pass(mono, 3000)
    apart = undo_db(-22) * np.roll(treble, 40) + undo_db(-50) * np.roll(mono, 900)
    return band_limit(np.array([mono + apart, mono - apart]))


dry = scene()
out = record(dry)
store_pcm(out)
```